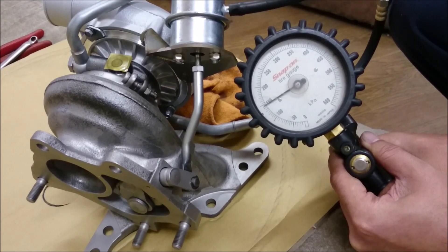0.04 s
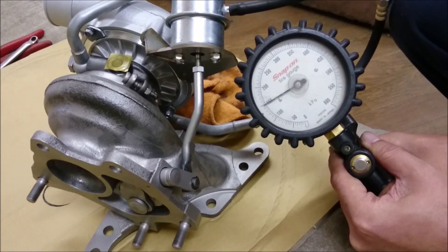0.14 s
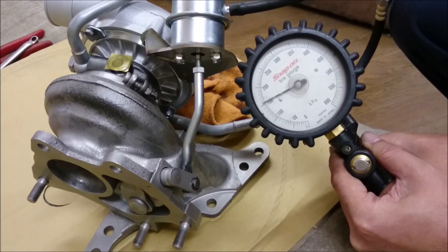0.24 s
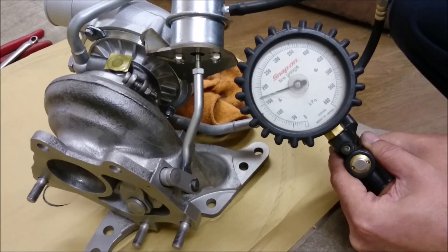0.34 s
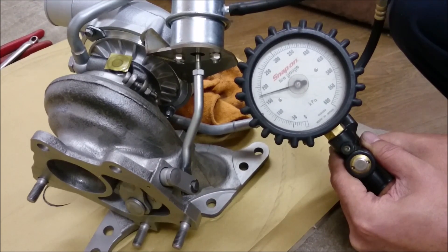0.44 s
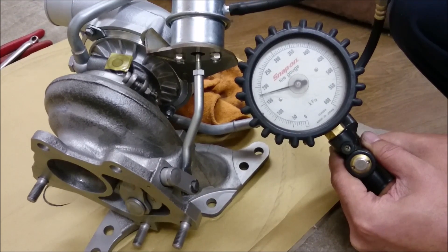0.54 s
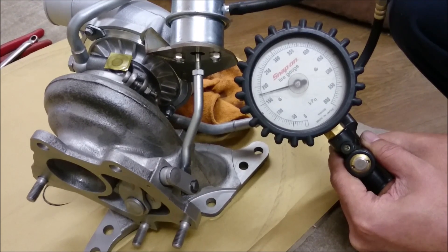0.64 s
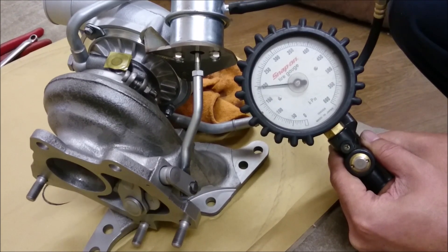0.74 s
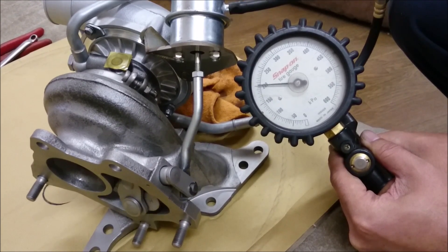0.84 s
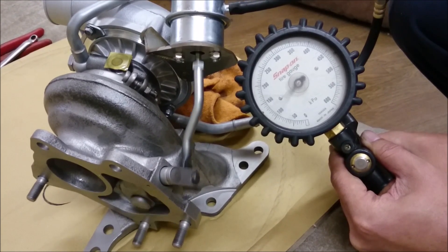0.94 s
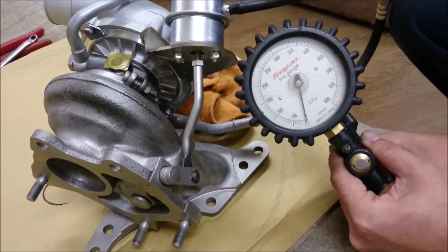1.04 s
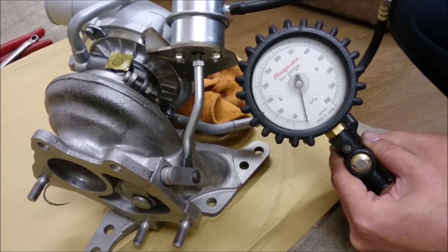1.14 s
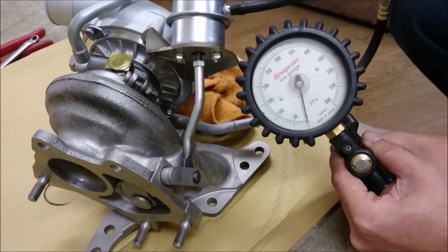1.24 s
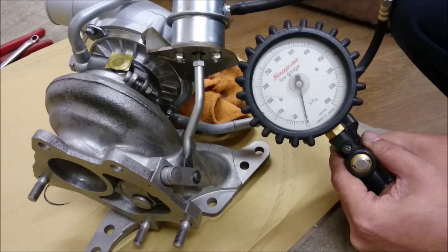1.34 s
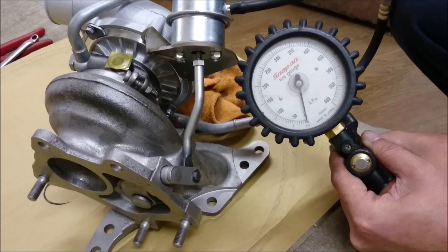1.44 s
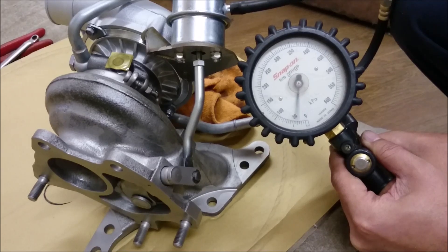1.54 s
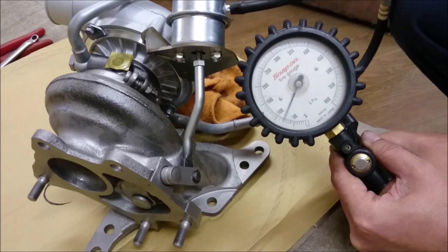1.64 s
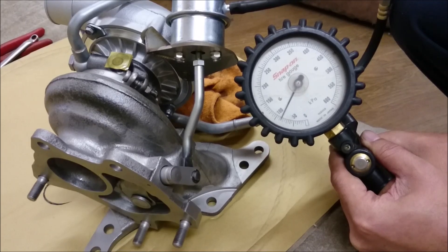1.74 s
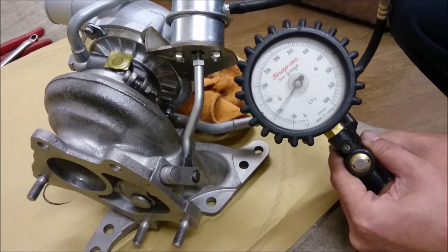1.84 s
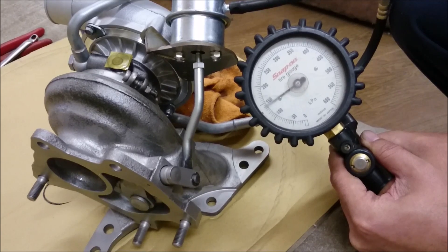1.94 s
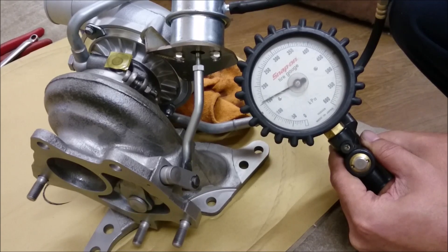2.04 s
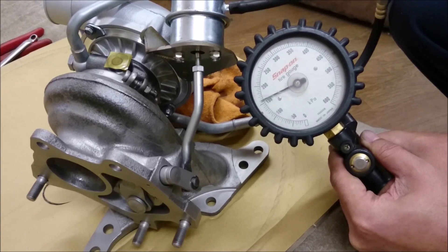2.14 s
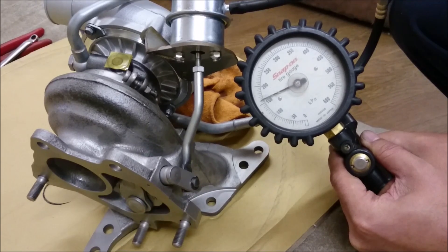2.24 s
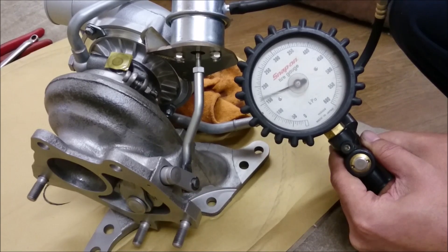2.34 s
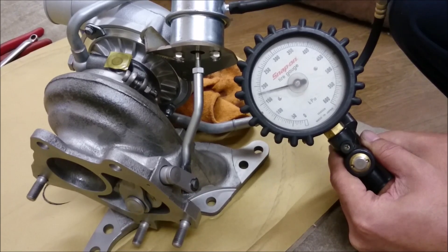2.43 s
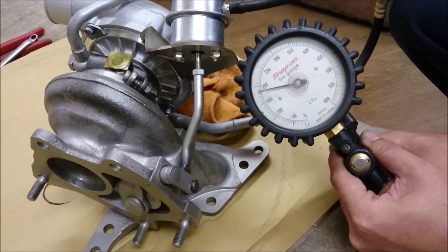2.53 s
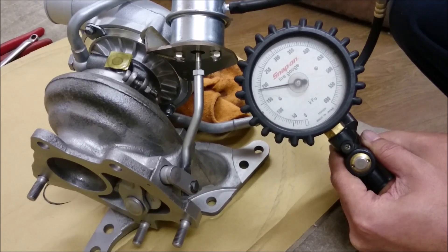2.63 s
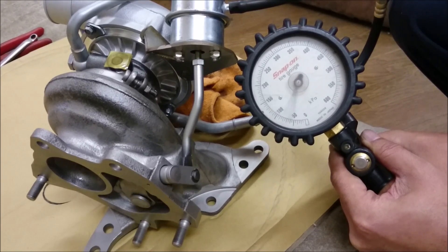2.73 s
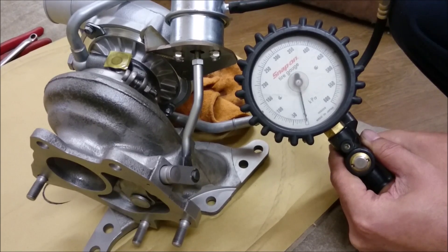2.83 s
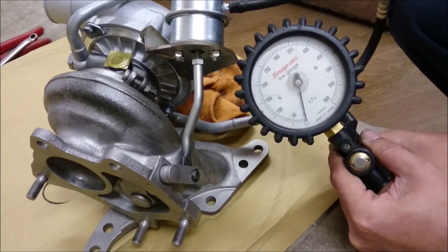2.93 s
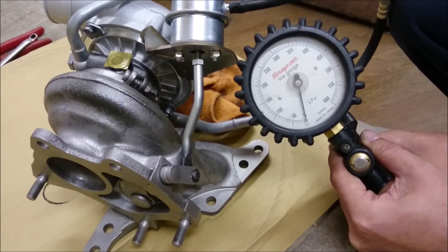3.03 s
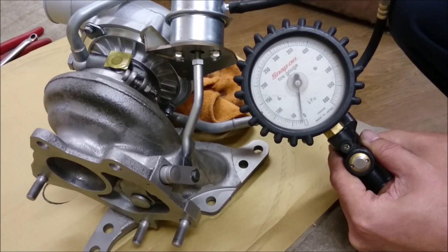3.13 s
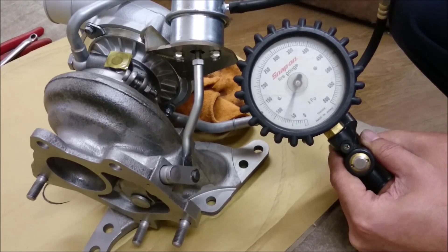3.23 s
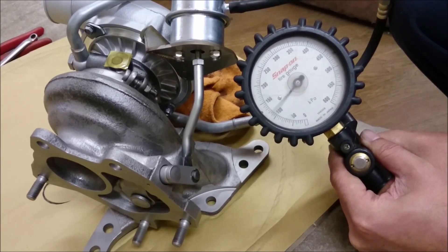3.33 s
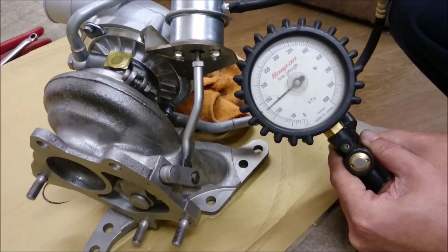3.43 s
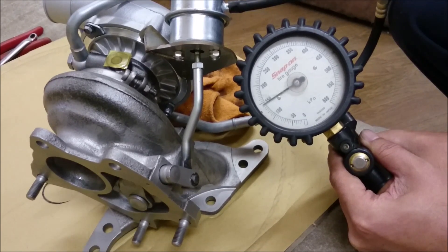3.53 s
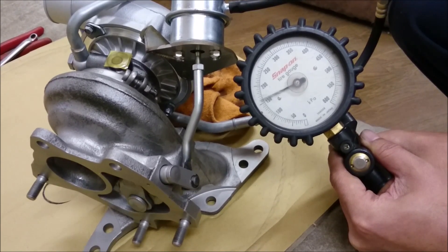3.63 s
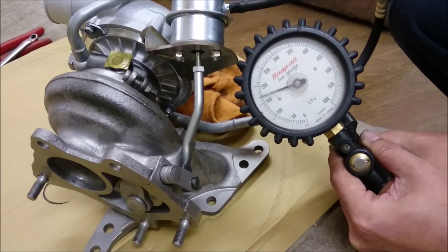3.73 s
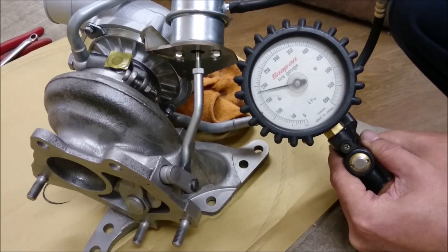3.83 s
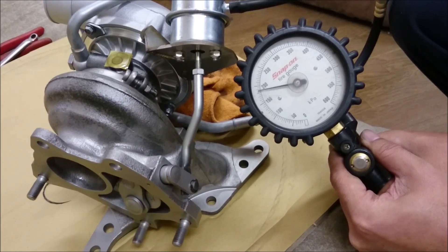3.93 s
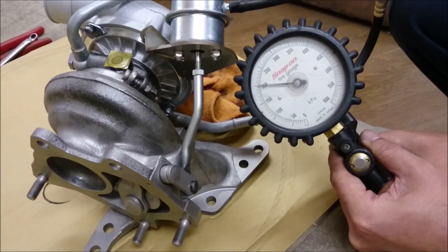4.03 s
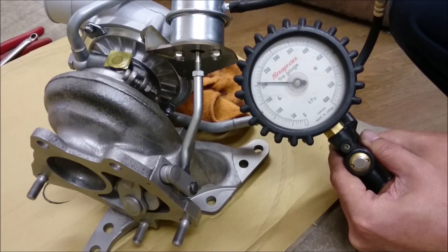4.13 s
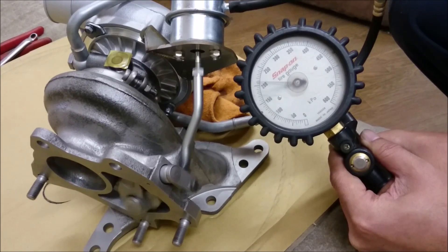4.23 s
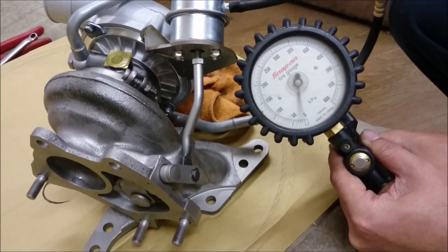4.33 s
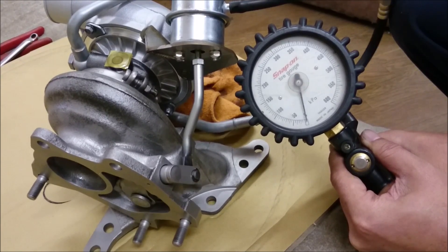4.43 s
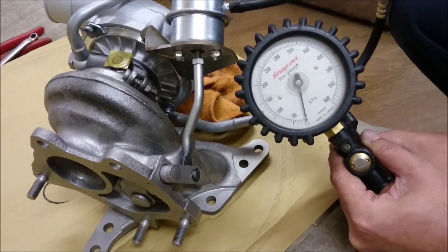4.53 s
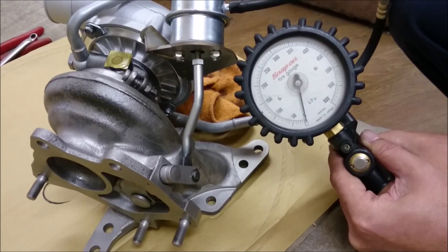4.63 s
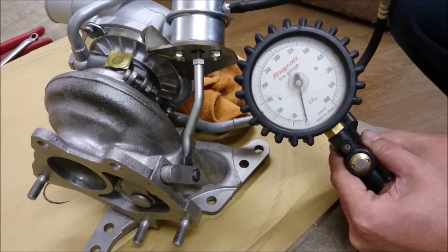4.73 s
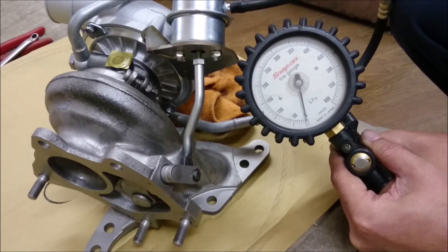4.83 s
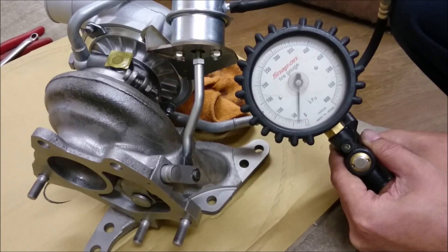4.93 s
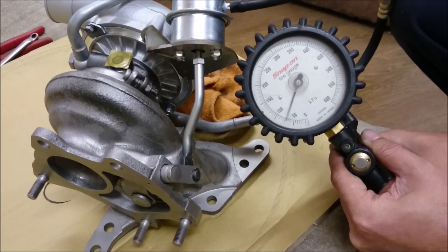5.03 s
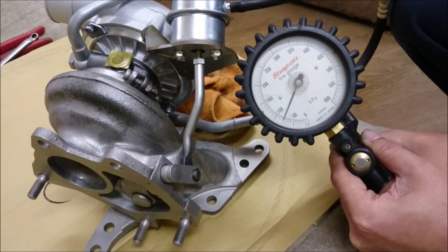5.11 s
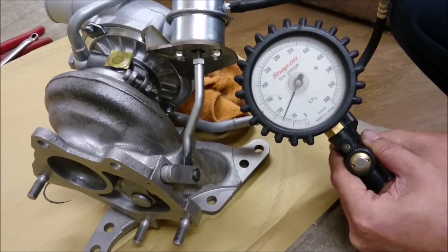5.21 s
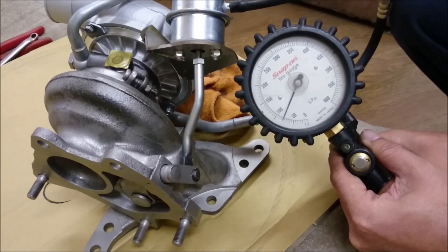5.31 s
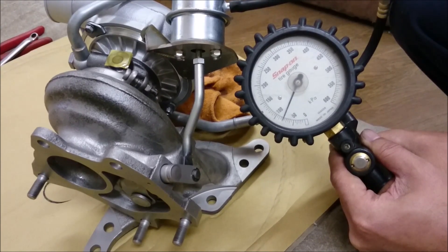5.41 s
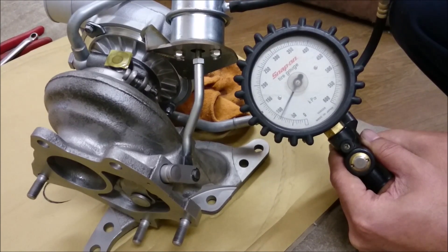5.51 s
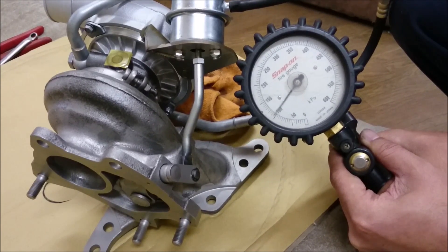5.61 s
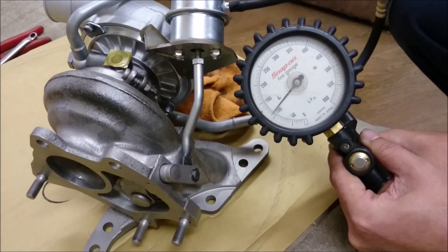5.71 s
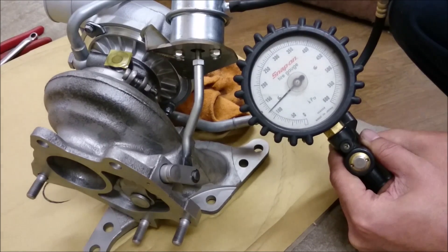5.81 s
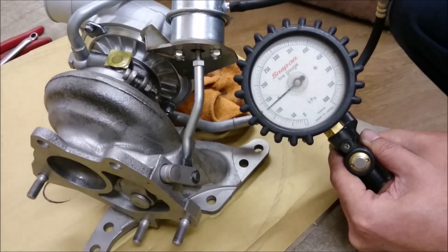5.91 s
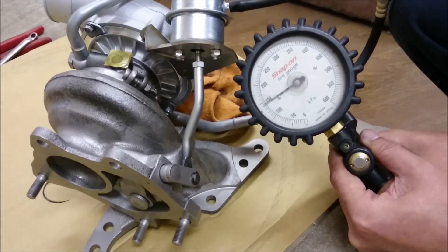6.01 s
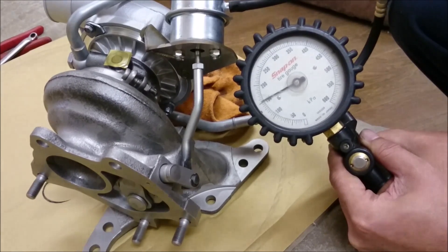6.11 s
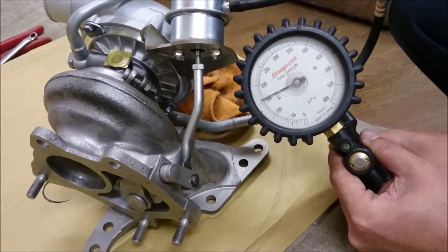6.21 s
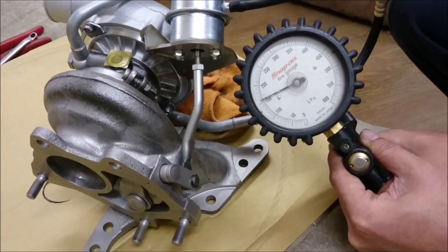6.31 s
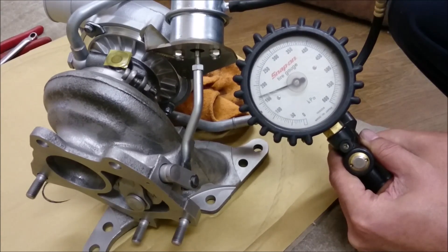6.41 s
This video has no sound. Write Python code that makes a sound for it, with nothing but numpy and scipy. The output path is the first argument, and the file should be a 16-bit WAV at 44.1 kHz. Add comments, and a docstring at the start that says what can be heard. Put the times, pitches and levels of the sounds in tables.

```python
"""A loud hiss of air with metallic ringing dies down to a faint leak three times and each time builds up again.
A hand-held inflator feeds the metal actuator of a turbocharger on a bench, close to a stereo microphone.
The jet at the coupling is coloured noise that rings narrow cavities; easing off the trigger cuts it.
Each squeeze lifts the valve with a thin sizzle. Puffs of air rumble on the microphone; walls add echoes."""
import sys
import numpy as np
from scipy import signal
from scipy.fft import rfft, irfft
from scipy.io import wavfile

SR = 44100
rng = np.random.default_rng(int(sys.argv[2]) if len(sys.argv) > 2 else 0)


def to_wav(s):
    """Save 16-bit WAV."""
    ch = np.atleast_2d(s).T  # columns
    pcm = np.round(np.clip(ch, -1, 1) * 32767)  # PCM
    wavfile.write(sys.argv[1], SR, pcm.astype(np.int16))


N = 284886
TIME_S = np.arange(N) / SR
FREQ_HZ = np.arange(N // 2 + 1) * SR / N

# Spectrum levels are those of the noise before gain curves and trim.
# Colour of the open jet. Each row: frequency in Hz, left and right level in dB per Hz.
JET_COLOUR = [(131, -125.0, -95), (465, -101.0, -84.5), (710, -91, -75), (1040, -77, -70.5),
              (2005, -71.5, -65.5), (2700, -71.5, -57.5), (3630, -66.5, -56), (4990, -56.5, -55.5),
              (6370, -52.5, -65.5), (8000, -60, -64.5), (10600, -60, -60), (12000, -75, -61),
              (13400, -63, -57.5), (15600.0, -73, -62)]
# Standing waves in coupling and actuator can.
# Each row: frequency in Hz, width in Hz, left and right peak in dB per Hz.
CAVITY_MODES = [(3333.0, 211.0, -77.0, -56.0), (3348.0, 55.0, -69.0, -55.0), (3417.0, 85.0, -63.0, -51.0),
                (3780.0, 44.0, -74.0, -49.0), (3857.0, 54.0, -64.0, -48.0), (3973.0, 108.0, -57.0, -44.0),
                (4050.0, 67.0, -55.0, -42.0), (4126.0, 58.0, -56.0, -44.0), (4141.0, 108.0, -58.0, -49.0),
                (4223.0, 128.0, -56.0, -48.0), (4398.0, 104.0, -59.0, -51.0), (4672.0, 58.0, -60.0, -56.0),
                (4933.0, 56.0, -66.0, -57.0)]
# Resonances of the nozzle and the gaps near it.
# Each row: frequency in Hz, width in Hz, left and right peak in dB per Hz.
NOZZLE_MODES = [(1700, 170, -80, -87.0), (4785, 82, -48.5, -68), (6980, 220, -54.5, -58),
                (8780, 250, -55, -91), (9240, 150, -55.5, -63), (10175, 280, -52.5, -74),
                (13000, 420, -89.0, -56.0), (14480, 560, -86.0, -54.5)]
# Reflections off the casting cancel bands at the left port.
# Each row: frequency in Hz, width in Hz, gain at the centre in dB.
CASTING_NOTCHES = [(5360, 820, -1.5), (8170, 230, -3), (12470, 200, -10), (14200, 300, -7)]
# The trigger is let go. Each row: start in seconds, spit of the closing valve in dB re the open rush.
RELEASES = [(.969, 2), (2.745, .5), (4.307, 1)]
# The trigger is squeezed again. Each row: valve lift in seconds, wide open in seconds, lift speed in
# dB per second, pressure surge in dB, surge settling time in seconds, sizzle gain in dB, whistle in dB.
SQUEEZES = [(1.479, 1.61, 252, 1.6, 0.11, -3, 8.5), (3.131, 3.281, 350, 3, 0.23, -3.5, 6),
            (4.84, 5.082, 418, 2.5, .06, -6, 6)]
# The hiss swells in mid-squeeze. Each row: centre in seconds, length in seconds, rise in dB.
JET_SWELLS = [(1.717, 0.037, 1.5), (1.97, 0.097, 2), (2.6, 0.05, 0.8)]
# Thin slit at the valve seat.
# Each row: frequency in Hz, width in Hz, left and right peak in dB per Hz.
SLIT_MODES = [(2220, 380, -77, -66), (3400, 330, -80, -63), (10300, 970, -59.5, -61),
              (12700, 1200, -84, -65)]
# Hose leak over the quiet workshop. Each row: frequency in Hz, left and right level in dB per Hz.
LEAK_COLOUR = [(30, -109, -109), (80.4, -100, -101), (256, -100, -99.5), (610, -98.5, -96),
               (1800, -96, -92.5), (2780, -98, -87), (3800, -102, -89), (4500, -94, -91),
               (5940, -90.5, -94), (6300, -83, -90), (8040, -87, -88.5), (9800, -87, -99),
               (11700, -103, -94), (15500, -105, -95)]
# Puffs of air brush the microphone. Each row: centre in seconds, length in seconds, gain in dB.
PUFFS = [(1.66, .025, 15), (1.96, 0.077, 18), (3.48, .08, 4), (3.67, .02, 3), (5.09, 0.026, 22)]
# Rumble of the puffs. Each row: frequency in Hz, width in Hz, left and right peak in dB per Hz.
RUMBLE_MODES = [(80, 200, -120, -101)]

PORT_LAG_S = 0.000238  # right port after left
TOP_HZ = 15750
# A valve just off its seat passes LIFT_DB of the full jet; the level then climbs ever faster.
LIFT_DB, BUILD_POWER = -13.5, 1.18
# Once let go, the jet rounds off over the knee, then falls steadily in dB, as the sound dies away in the room.
KNEE_S, FALL_DB_PER_S = 0.029, 192
SEAT_DB = -47  # below this share of the full jet nothing of it is left
SPIT_DELAY_S, SPIT_S = 0.025, 0.0055  # after the release
SIZZLE_S = 0.046  # around the lift
WHISTLE_DELAY_S, WHISTLE_S = 0.034, 0.029  # after the lift
FLARE_DELAY_S, FLARE_S = 0.025, 0.098  # after wide open


def jet(flutter_db, sway_db, split_hz, scatter_hz, rush_power, ring_power, ring_db):
    """Turbulent jet: large eddies rush, small ones hiss, and the metal cavities ring."""
    strength = flow()
    spits = swells((release_s + SPIT_DELAY_S, SPIT_S, db) for release_s, db in RELEASES)
    spectrum = colour(JET_COLOUR) * notches()
    large_share = 1 / (1 + (FREQ_HZ / split_hz) ** 8)
    rush = turbulence(spectrum * np.sqrt(large_share), shared=0.37)
    # the shortest waves bounce about the casting and reach the ports nearly unrelated
    direct_share = 0.06 + 0.64 / (1 + (FREQ_HZ / scatter_hz) ** 20)
    hiss = turbulence(spectrum * np.sqrt(1 - large_share), shared=direct_share)
    hiss = hiss + turbulence(resonances(NOZZLE_MODES), shared=direct_share)
    # the swaying jet excites the cavities unevenly
    drive_db = ring_db + sway_db * walk(20) + cavity_drive()
    ring = turbulence(resonances(CAVITY_MODES), shared=0.93) * amp(drive_db)
    rush_gain = np.hypot(strength ** rush_power, spits)
    air = hiss * strength + rush * rush_gain + ring * strength ** ring_power
    # pressure flutter in the hose shakes the whole jet at once
    return air * amp(flutter_db * walk(40))


def flow():
    """Amplitude of the jet, about 1 with the valve wide open; each release cuts it until the next squeeze."""
    level_db = sum(db * bump(centre_s, length_s) for centre_s, length_s, db in JET_SWELLS)
    for (release_s, _), squeeze in zip(RELEASES, SQUEEZES):
        level_db = level_db + np.maximum(closing(release_s), opening(*squeeze[:5]))
    return np.maximum(amp(level_db) - amp(SEAT_DB), 0)


def closing(release_s):
    """Level in dB once the trigger is let go: a rounded knee, then the steady decay of the sound in the room."""
    return -FALL_DB_PER_S * KNEE_S * np.logaddexp(0, (TIME_S - release_s) / KNEE_S)


def opening(lift_s, wide_s, db_per_s, surge_db, settle_s):
    """Level in dB in a squeeze: the valve lifts, opens wide, and stored pressure surges and settles."""
    seated_db = -db_per_s * np.maximum(lift_s - TIME_S, 0)
    travel = np.clip((TIME_S - lift_s) / (wide_s - lift_s), 0, 1) ** BUILD_POWER
    surge = np.exp(-np.maximum(TIME_S - wide_s, 0) / settle_s)
    return seated_db + LIFT_DB * (1 - travel) + surge_db * travel * surge


def cavity_drive():
    """Extra ring in dB: a barely open valve whistles in the cavities, then the pressure surge flares them."""
    drive_db = 0
    for lift_s, wide_s, _, surge_db, _, _, whistle_db in SQUEEZES:
        whistle = whistle_db * bump(lift_s + WHISTLE_DELAY_S, WHISTLE_S)
        flare = surge_db * bump(wide_s + FLARE_DELAY_S, FLARE_S)
        drive_db = drive_db + whistle + flare
    return drive_db


def notches():
    """Left and right gain per frequency of the casting's cancellations, left only."""
    left_db = sum(db * np.exp(-(2 * (FREQ_HZ - hz) / width_hz) ** 2)
                  for hz, width_hz, db in CASTING_NOTCHES)
    return amp([left_db, 0 * left_db])


def valve():
    """Air sizzles through the thin slit around the moment the valve lifts."""
    sizzle = swells((lift_s, SIZZLE_S, sizzle_db) for lift_s, *_, sizzle_db, _ in SQUEEZES)
    return turbulence(resonances(SLIT_MODES), shared=0.13) * sizzle


def leak(waver_db):
    """The pressurised hose seeps all the time, as steady noise with a slight waver."""
    return turbulence(colour(LEAK_COLOUR), shared=0.06) * amp(waver_db * walk(22))


def draught():
    """Puffs of stray air rumble on the microphone as low-frequency noise."""
    return turbulence(resonances(RUMBLE_MODES), shared=0.083) * swells(PUFFS)


def workshop(x, delay_s, spread_s, echo_db, t60_s, tail_hz, tail_db):
    """Nearby walls return a tight cluster of weak echoes and a short dull tail (tail_db before low-pass)."""
    t_s = TIME_S[:SR // 2]
    cluster = np.exp(-((t_s - delay_s) / spread_s) ** 2)
    decay = (t_s > delay_s) * np.exp(-np.log(1000) * t_s / t60_s)
    shapes = np.array([cluster, decay])
    shapes = shapes / np.linalg.norm(shapes, axis=1, keepdims=True)  # unit energy
    echoes, tail = shapes[:, None] * rng.standard_normal((2, 2, len(t_s)))
    dull_tail = signal.lfilter(*signal.butter(1, tail_hz, fs=SR), tail)
    response = amp(echo_db) * echoes + amp(tail_db) * dull_tail
    return x + signal.fftconvolve(x, response, axes=1)[:, :N]


def turbulence(gain, shared):
    """Coloured stereo noise: a shared part reaches the left port first, the rest is scattered by the casting."""
    direct, *scattered = rfft(rng.standard_normal((3, N)))
    shared = np.clip(shared, 0, 1)  # share of power
    arrival = np.exp(-2j * np.pi * FREQ_HZ * np.array([[0], [PORT_LAG_S]]))
    field = np.sqrt(shared) * direct * arrival + np.sqrt(1 - shared) * np.array(scattered)
    return irfft(field * gain, N) * np.sqrt(SR / 2)  # gain becomes a density per Hz


def colour(points):
    """Left and right gain per frequency, interpolated in dB over log frequency."""
    hz, *sides_db = np.transpose(points)
    return amp([np.interp(np.log(FREQ_HZ + 1), np.log(hz), db) for db in sides_db])


def resonances(modes):
    """Left and right gain per frequency of steep-sided resonances whose powers add."""
    power = 0
    for hz, width_hz, left_db, right_db in modes:
        shape = 1 / (1 + (2 * (FREQ_HZ - hz) / width_hz) ** 2)
        power = power + (amp([[left_db], [right_db]]) * shape) ** 2
    return np.sqrt(power)


def walk(rate_hz):
    """Smooth random wander of standard deviation 1, with about rate_hz changes a second."""
    wander = irfft(rfft(rng.standard_normal(N)) / (1 + (2 * FREQ_HZ / rate_hz) ** 2), N)
    return wander / wander.std()


def swells(events):
    """Gain curve of rounded swells given as (centre in s, length in s, dB)."""
    return sum(amp(db) * bump(centre_s, length_s) for centre_s, length_s, db in events)


def bump(centre_s, length_s):
    """Gaussian swell of height 1; length_s is from the centre to 1/e."""
    return np.exp(-((TIME_S - centre_s) / length_s) ** 2)


def amp(db):
    """Decibels to gain."""
    return 10 ** (np.asarray(db) / 20)


def scene():
    """Jet, valve and leak in the workshop, with the draught at the microphone."""
    air = amp(-0.32) * jet(flutter_db=0.51, sway_db=1.0, split_hz=2950, scatter_hz=5200,
                           rush_power=0.93, ring_power=0.93, ring_db=-0.07)
    air = air + valve() + leak(waver_db=0.1)
    room = workshop(air, delay_s=0.012, spread_s=0.0066, echo_db=-11.5,
                    t60_s=0.48, tail_hz=1500, tail_db=-9.0)
    return room + draught()


def record(dry):
    """The recorder cuts the top steeply: elliptic low-pass, 0.1 dB ripple, 80 dB stop band."""
    return signal.sosfilt(signal.ellip(12, 0.1, 80, TOP_HZ, fs=SR, output="sos"), dry)


dry = scene()
out = record(dry)
to_wav(out)
```